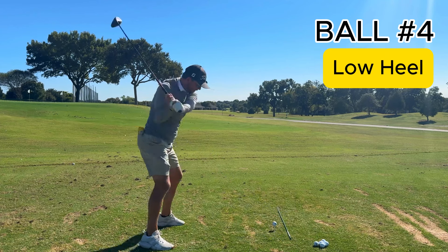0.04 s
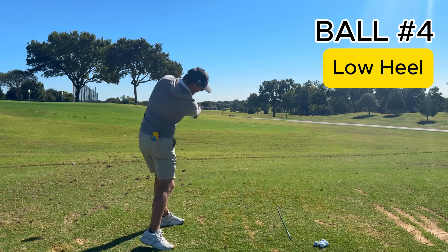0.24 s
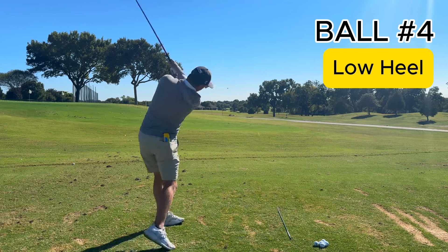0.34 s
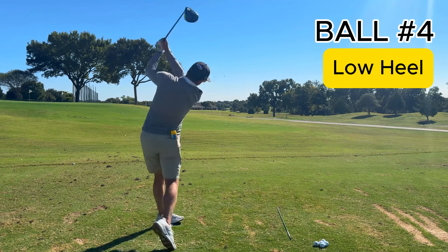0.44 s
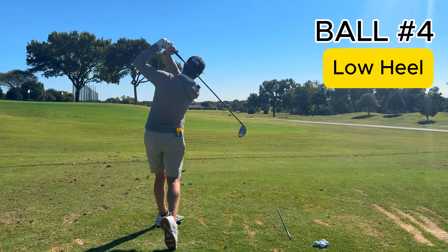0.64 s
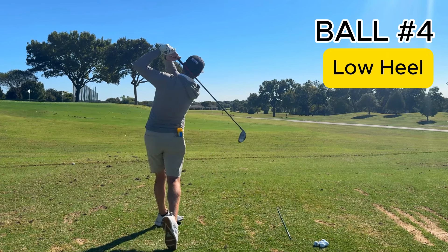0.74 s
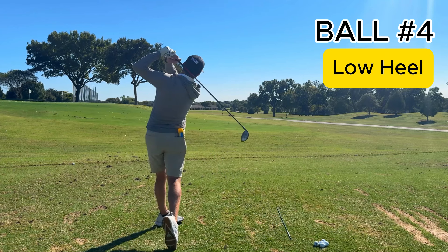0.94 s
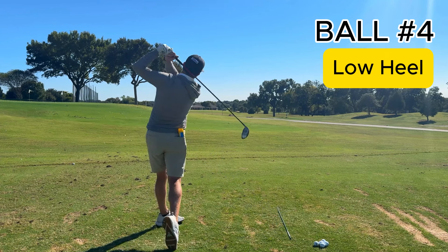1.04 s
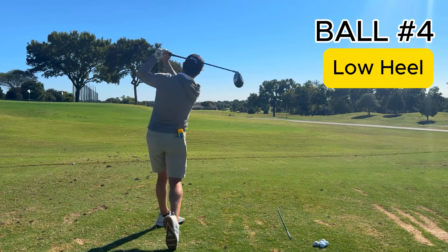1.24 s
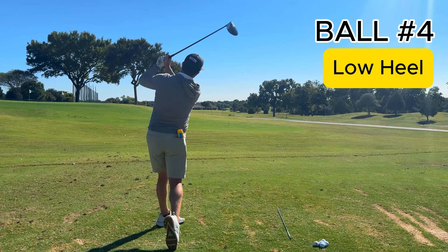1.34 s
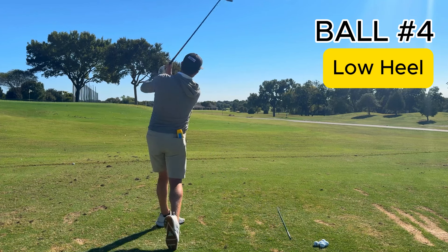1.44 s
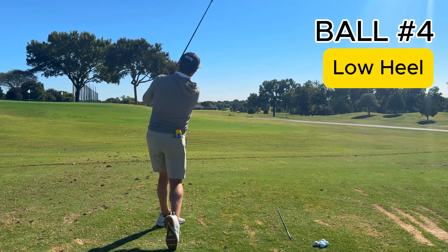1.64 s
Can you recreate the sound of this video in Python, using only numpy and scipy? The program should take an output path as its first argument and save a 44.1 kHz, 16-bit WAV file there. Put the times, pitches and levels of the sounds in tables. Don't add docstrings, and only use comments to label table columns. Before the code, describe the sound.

A golf club whooshes briefly and cracks a ball with one loud, bright metallic snap, a very short ring and faint echoes; then a quiet open range with soft breeze, heard in mono from several steps away.

```python
import sys
import numpy as np
from scipy import signal
from scipy.io import wavfile

SR = 44100
rng = np.random.default_rng(int(sys.argv[2]) if len(sys.argv) > 2 else 0)


def wrap_up_sound(samples):
    columns = np.atleast_2d(samples).T
    tamed = np.clip(columns, -1, 1)
    steps = np.round(tamed * 32767).astype(np.int16)
    wavfile.write(sys.argv[1], SR, steps)


def invert_db(x):
    u = np.asarray(x, float) / 20
    return 10 ** u


N = 74970
CUTOFF_HZ = 16900


def rms_one(x):
    return x / np.sqrt(np.mean(x ** 2) + 1e-20)


def in_time(rows):
    s, *columns = np.transpose(rows)
    return [np.interp(np.arange(N) / SR, s, c) for c in columns]


def drift(rate_hz):
    r = np.exp(-2 * np.pi * rate_hz / SR)
    wander = signal.lfilter([1], [1, -2 * r, r * r], rng.standard_normal(N + SR))
    return rms_one(wander[SR:])


def band(x, low_hz, high_hz):
    edges_hz = np.clip([low_hz, high_hz], 10, 19000)
    return signal.sosfilt(signal.butter(2, edges_hz, "band", fs=SR, output="sos"), x)


def dying(start_s, db, t60):
    age = np.arange(N) / SR - start_s
    return (age >= 0) * invert_db(db - 60 * np.maximum(age, 0) / t60)


def struck(modes, strength_db, spread_db):
    at = (np.array(START_S) * SR).astype(int)
    luck = rng.standard_normal((len(at), len(modes)))
    out = 0
    for k, (hz, db, t60) in enumerate(modes):
        clicks = np.full(N, 1e-18)
        clicks[at] = invert_db(strength_db + db + spread_db * luck[:, k]) * (-1) ** k
        r = invert_db(-60 / (t60 * SR))
        w = 2 * np.pi * hz / SR
        out = out + signal.lfilter([0, np.sin(w)], [1, -2 * r * np.cos(w), r * r], clicks)
    return out


def coloured(spectrum, patchy_db):
    hz, db = np.transpose(spectrum)
    white = rng.standard_normal((2, N + SR // 2))
    edges = 20 * 2 ** np.arange(0, 9.8, 1 / 3)
    together = drift(1.5)
    out = 0
    for k, (low, high) in enumerate(zip(edges, edges[1:])):
        level_db = np.interp(np.log(low * high) / 2, np.log(hz), db)
        if level_db > -55:
            flicker_db = patchy_db * (.6 * together + drift(9))
            out = out + invert_db(level_db + flicker_db) * band(white[k % 2], low, high)[-N:]
    return rms_one(out)


START_S = [.2106, .2121, .2131, .2152, .2208, .2217]
# face_db, knock_db, crack_db, shell_db
START_LEVELS = [(-21, -16, -28, -70), (-30, -16, -32, -70), (-6, -19, -12, -70), (-15, -14, -26, -70),
                (-9, -11, -24, -70), (-13, -30, -13, -24)]


def strike():
    face_db, knock_db, crack_db, shell_db = np.transpose(START_LEVELS)
    rings = face_ring(face_db) + shell_ring(shell_db)
    blow = crack(crack_db) + turf_scatter() + ball_knock(knock_db)
    return rings + blow + echoes(blow)


# pitch_hz, level_db, t60_s
FACE = [(3960, -8, .04), (4170, -10, .03), (4520, -6, .032), (4985, -2, .035), (5390, -3, .035),
        (5790, -3, .022), (6120, -1, .02), (6400, -2, .022), (6990, -6, .016), (8200, -7, .012),
        (9800, -11, .02), (11500, -16, .01)]


def face_ring(face_db):
    return struck(FACE, face_db - 8, spread_db=1.5)


# pitch_hz, level_db, t60_s
SHELL = [(1976, -14, .085), (2116, -20, .21), (3268, -19, .12), (3634, -17, .16), (4511, -24, .1),
         (5426, -4, .051), (6358, -3, .059), (6864, -14, .066), (7031, -2, .061), (8210, -21, .08),
         (8791, -22, .076), (9324, -19, .068), (9916, -12, .043), (10280, -12, .039)]


def shell_ring(shell_db):
    return struck(SHELL, shell_db, spread_db=.5)


def crack(crack_db):
    t60_s, low_hz, high_hz = 0.011, 3980, 15450
    bursts = sum(dying(start_s, db, t60_s) for start_s, db in zip(START_S, crack_db))
    return band(bursts * rng.standard_normal(N), low_hz, high_hz)


def turf_scatter():
    level_db, t60_s, low_hz, high_hz = 1.5, 0.041, 3400, 7752
    scatter = dying(START_S[2], level_db, t60_s) * rng.standard_normal(N)
    return band(band(scatter, low_hz, high_hz), low_hz, high_hz)


# pitch_hz, level_db, t60_s
KNOCK = [(125, -24, .03), (430, -6, .012), (800, -5, .008), (1250, -3, .008), (1700, -4, .005),
         (2400, -3, .005), (3300, -10, .004)]


def ball_knock(knock_db):
    return band(struck(KNOCK, knock_db, spread_db=1.0), 110, CUTOFF_HZ)


# delay_s, level_db, centre_hz, width_hz, smear_s
ECHOES = [
    (.053, -36, 4850, 700, .003),
    (.056, -31, 1200, 400, .005),
    (.2, -64, 6000, 2500, .008),
    (.252, -56, 6100, 1100, .016),
    (.84, -43, 350, 300, .004),
]


def echoes(x):
    out = np.zeros(N)
    age = np.arange(SR // 10) / SR
    for delay_s, db, hz, width_hz, smear_s in ECHOES:
        facets = rng.standard_normal(len(age)) * np.exp(-age / smear_s)
        smeared = signal.fftconvolve(x, facets / np.linalg.norm(facets))[:N]
        back = band(smeared, hz - width_hz / 2, hz + width_hz / 2)
        lag = int(delay_s * SR)
        out[lag:] += invert_db(db) * back[:N - lag]
    return out


# time_s, level_db, pitch_hz
SWING = [(.1, -74, 330), (.14, -57, 460), (.17, -46, 860), (.186, -43, 780), (.2, -33, 760),
         (.206, -46, 760), (.245, -57, 520), (.278, -52, 350), (.325, -100, 320)]


def shaft_song():
    level_db, pitch_hz = in_time(SWING)
    turn = 2 * np.pi * np.cumsum(pitch_hz) / SR
    sing = 0
    for k, part_db in ((.5, -8), (1, 0.024), (2, -15)):  # (multiple of the pitch, dB)
        spread_hz = 135 * k
        wavering = drift(spread_hz) * np.cos(k * turn) + drift(spread_hz) * np.sin(k * turn)
        sing = sing + invert_db(part_db) * wavering
    return invert_db(level_db) * sing


# time_s, level_db
RUSH = [(.11, -77), (.15, -67.5), (.18, -55), (.205, -51), (.24, -58), (.262, -53.5), (.285, -60),
        (.32, -73.5), (.4, -85)]
# pitch_hz, level_db (per Hz)
RUSH_COLOUR = [(760, -38), (1300, -2), (5310, -2), (5900, -11.5), (7350, -6), (12000, -24), (16000, -37.5)]


def head_rush():
    flutter_db = 1.5 * drift(89)
    return invert_db(in_time(RUSH)[0] + flutter_db) * coloured(RUSH_COLOUR, patchy_db=-1.5)


# time_s, level_db, half_length_s, centre_hz, width_ratio
RUSTLES = [(.038, -61, 0.0099, 4170, 1.7), (.005, -66.5, 0.033, 760, 1.7), (.005, -73, 0.043, 3550, 2.2),
           (0.471, -79.5, 0.016, 2310, 1.5), (0.664, -85.5, 0.097, 2780, 1.1),
           (.75, -84.5, 0.13, 6040, 1.6)]


def rustles():
    t = np.arange(N) / SR
    grains = rng.standard_normal((len(RUSTLES), N)) * invert_db(1.1 * drift(240))
    out = 0
    for (s, db, half_s, hz, wide), grain in zip(RUSTLES, grains):
        swell = invert_db(db - 4.3 * ((t - s) / half_s) ** 2)
        out = out + swell * rms_one(band(grain, hz / wide, hz * wide))
    return out


# start_s, level_db, pitch_hz, t60_s
TICKS = [(1.045, -68, 5000, .009), (1.054, -65, 5000, .009), (1.0605, -64, 5000, .009),
         (1.054, -68, 1900, .005), (1.0605, -67, 2400, .005), (.115, -59, 3200, .005)]


def ticks():
    t = np.arange(N) / SR
    return sum(dying(s, db, t60) * np.sin(2 * np.pi * hz * (t - s)) for s, db, hz, t60 in TICKS)


# multiple (of its base pitch), level_db
ENGINE = [(4, -79), (5, -81), (6, -85), (8, -82), (9, -78), (10, -80), (12, -85), (13, -88)]
# time_s, level_db
ENGINE_NEAR = [(0, -8), (.4, -2), (.55, 0), (.75, 0), (.87, -9), (1.2, -16), (1.7, -18)]


def far_machines():
    hum_hz, engine_hz = 86.1, 74.7
    turn = 2 * np.pi * np.cumsum(1 + .002 * drift(3)) / SR
    engine = 0
    for k, db in ENGINE:
        strength = invert_db(db + 2.5 + 2.5 * drift(10))
        engine = engine + strength * np.sin(k * engine_hz * turn + rng.uniform(0, 2 * np.pi))
    hum = invert_db(-75.5 + 1.5 * drift(2.7)) * np.sin(hum_hz * turn)
    return hum + invert_db(in_time(ENGINE_NEAR)[0]) * engine


# time_s, level_db
BREEZE = [(0.35, -74), (0.432, -78), (0.736, -84), (0.88, -87.5), (1.108, -90.5), (1.44, -84.5), (1.7, -93)]
# pitch_hz, level_db (per Hz)
LEAVES = [(880, -31.5), (1500, -19), (1620, 1), (1810, -11.5), (4080, -9.5), (13000, -23.5), (16000, -37)]


def leaves():
    return invert_db(in_time(BREEZE)[0] - 2.0) * coloured(LEAVES, patchy_db=2.4)


# pitch_hz, level_db (per Hz)
AIR = [(9, -27), (15, 2), (24, -11), (91, -5.5), (194, -21), (330, -26), (620, -21.5), (1000, -26.5),
       (1600, -38), (2080, -67.5)]


def far_traffic():
    return invert_db(-64) * coloured(AIR, patchy_db=.9)


def scene():
    floor = far_traffic() + leaves()
    club = strike() + shaft_song() + head_rush()
    return (club + rustles() + ticks() + far_machines() + floor)[None]


def roll_off(x):
    return signal.sosfilt(signal.butter(12, 16630, fs=SR, output="sos"), x)


def record(dry):
    top = .85
    rounded = top * np.tanh(dry / top)
    kept = signal.sosfilt(signal.cheby2(10, 60, CUTOFF_HZ, fs=SR, output="sos"), rounded)
    sway = invert_db(-63.5) * drift(2.3)
    mix = kept - 0.00049 + sway
    return roll_off(mix)


dry = scene()
out = record(dry)
wrap_up_sound(out)
```